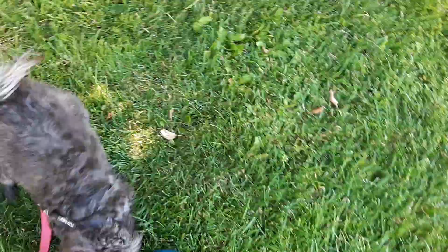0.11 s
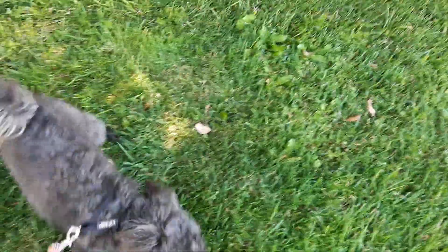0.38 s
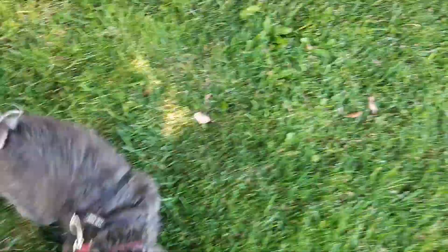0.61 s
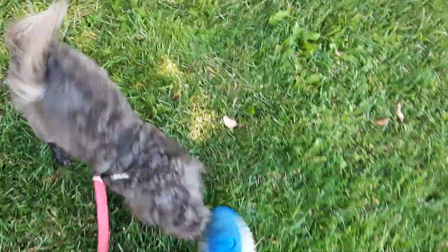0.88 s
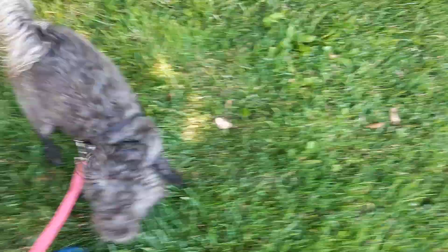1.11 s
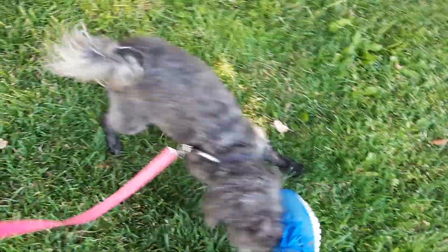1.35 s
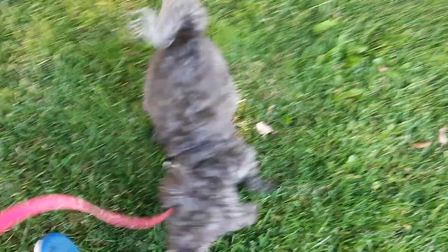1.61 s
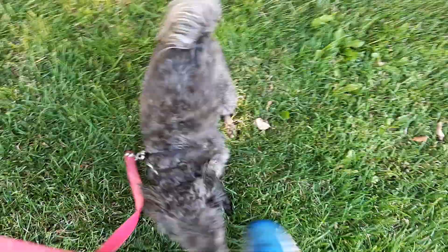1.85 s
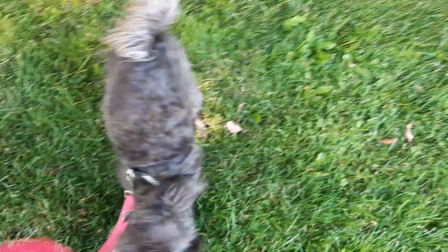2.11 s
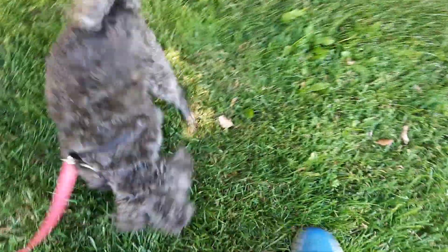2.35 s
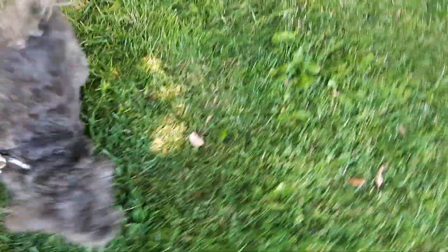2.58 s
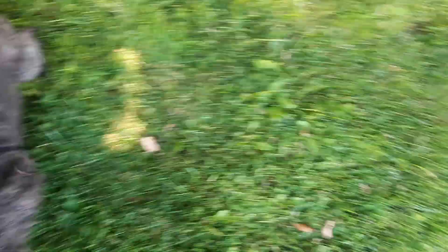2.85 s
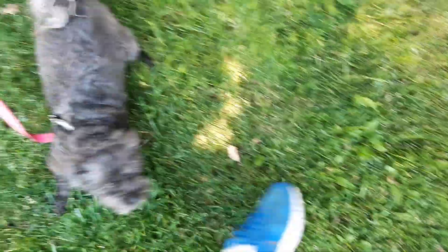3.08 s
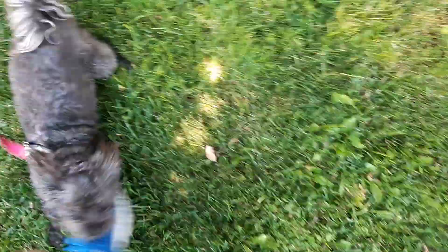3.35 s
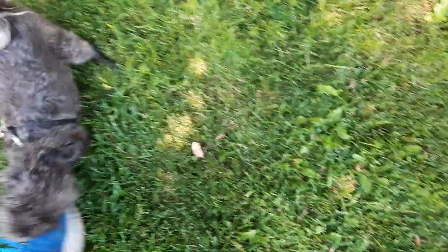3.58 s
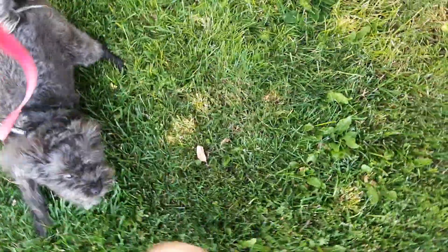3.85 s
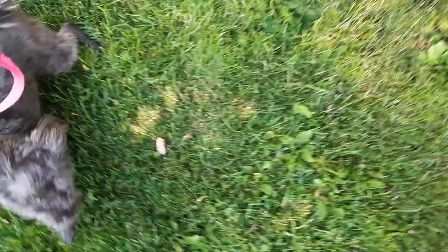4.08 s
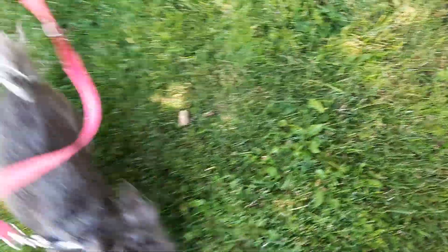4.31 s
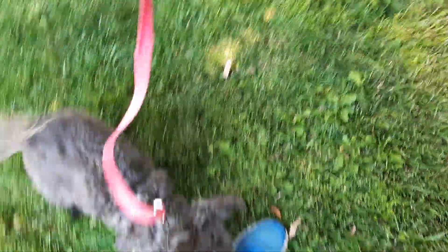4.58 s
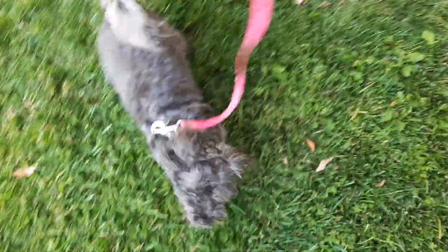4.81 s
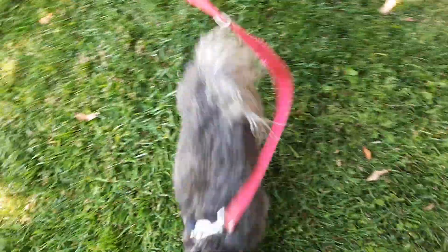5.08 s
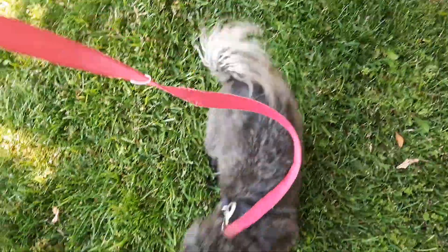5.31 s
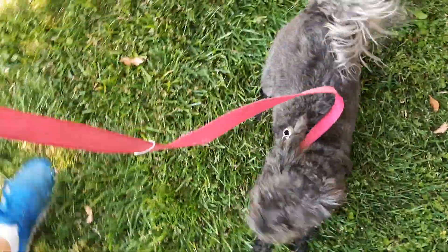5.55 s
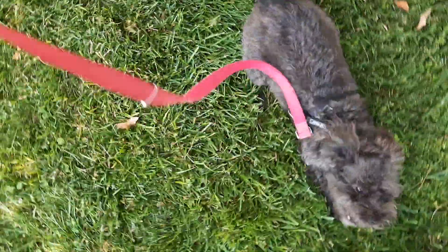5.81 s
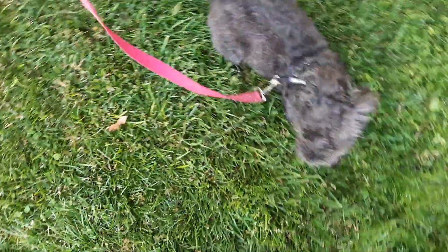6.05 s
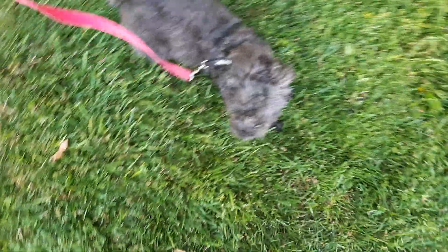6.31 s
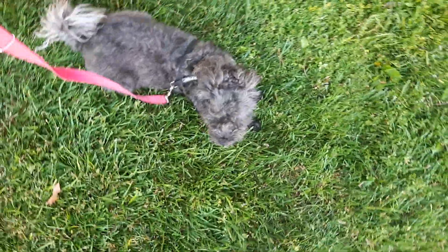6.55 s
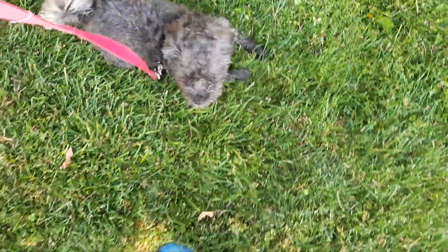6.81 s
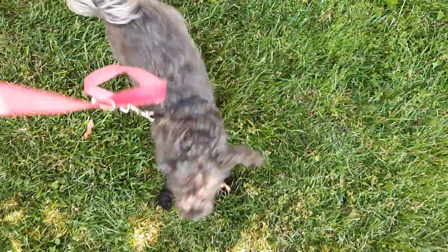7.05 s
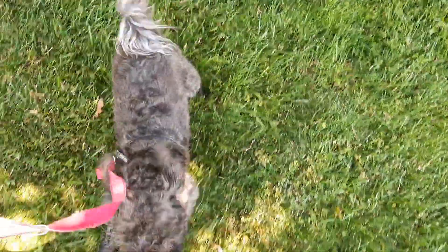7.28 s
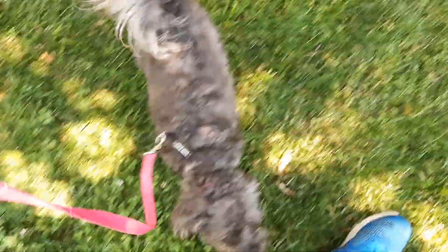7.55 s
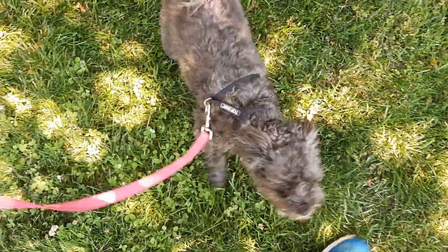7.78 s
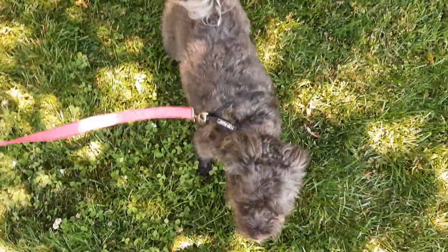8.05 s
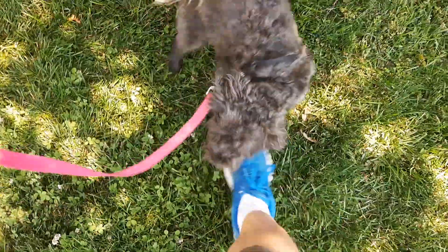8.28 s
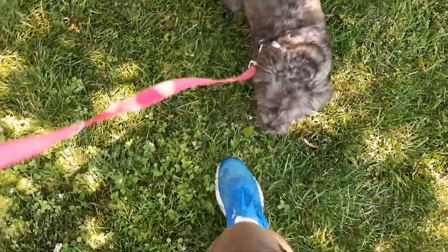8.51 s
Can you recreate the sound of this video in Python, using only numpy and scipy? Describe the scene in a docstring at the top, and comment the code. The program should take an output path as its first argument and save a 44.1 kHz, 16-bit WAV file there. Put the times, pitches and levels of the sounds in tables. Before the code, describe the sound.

Close, dry outdoor sound from a hand-held phone, with faint park hush, rustling grass and uneven low wind. A small dog starts with a soft raspy growl at 0 s; bumps and a clink follow around 0.5 s. Stronger growls come at 0.7 and from 1.1 to 1.9 s, throaty and fluttering, then another at 2.1 s. A brief, higher, sharper snarl jumps out at 2.8 s. Bright collar and leash clinks punctuate this part, notably at 2.1, 3.0 and 3.4 s. Short growls continue at 3.2 and 3.7 s, one swelling at 4.3 to 4.5 s, another at 4.8 s. From 5.2 s they fade to breathy pants; wind swells, with knocks at 5.7 to 6 s. Two loud, abrupt barks strike at 6.85 and 7.2 s, the second pitched a little higher. A faint breath follows at 7.7 s, then a weak dying growl at 8.15 s with a tiny clink.

```python
"""Small dog at play on grass

A small dog on a leash growls, pants and barks twice below a hand-held phone: source-filter synthesis, in
which fold pulses and breath excite resonances of chest, mouth, upper throat and muzzle.
Metal parts of collar and leash clink as sums of decaying modes; buffets and knocks are sinking, dying swings.
Shaped noise gives wind, unrelated at the two microphone ports, and grass rustling under a faint park hush.
"""
import sys
import numpy as np
from scipy import signal
from scipy.io import wavfile
from scipy.ndimage import uniform_filter1d, minimum_filter1d, map_coordinates

SR = 44100
rng = np.random.default_rng(int(sys.argv[2]) if len(sys.argv) > 2 else 0)


def invert_db(level):
    """Linear amplitude ratio for a level in decibels (20 dB per decade), elementwise."""
    return 10 ** (np.asarray(level, dtype=float) / 20)


def unload_wav(signal):
    """Save mono or channel-first audio to the path in sys.argv[1] as 16-bit WAV at rate SR, clipped to [-1, 1]."""
    wavfile.write(
        sys.argv[1],
        SR,
        np.round(np.clip(np.atleast_2d(signal).T, -1, 1) * 32767).astype(np.int16),
    )


N = 381465  # length in samples

# Effort of each call: start_s, rise_s, hold_s, fade_s, first_db, last_db
CALLS = [(0.0, 0.009, 0.35, 0.042, -34, -41.5), (0.67, 0.024, 0.2, 0.054, -27, -27.5),
         (1.11, 0.082, 0.55, .14, -24, -24.5), (2.056, 0.083, 0.26, 0.095, -24.5, -26.5),
         (2.43, 0.026, 0.062, 0.048, -29, -32.5), (2.769, 0.034, 0.085, 0.03, -18.5, -34),
         (3.155, .012, 0.21, 0.061, -29.5, -31.5), (3.402, .012, 0.029, .05, -26.5, -35.5),
         (3.729, 0.051, 0.12, 0.048, -26.5, -42), (4.269, 0.012, 0.24, 0.049, -33.5, -19.5),
         (4.742, 0.027, 0.17, 0.055, -29.5, -24), (5.179, 0.026, 0.18, 0.053, -34.5, -38.5),
         (5.643, .025, 0.12, 0.044, -34, -48), (6.02, 0.023, 0.065, 0.039, -46.5, -49),
         (6.83, 0.047, 0.084, 0.035, -12.5, -15), (7.14, 0.079, 0.071, 0.11, -19.5, -16.5),
         (7.664, 0.019, 0.17, 0.044, -45.5, -51), (8.136, 0.044, 0.25, 0.058, -31.5, -49.5)]
# Voice of each call: central fold rate_hz, roughness (0-1), chest_db, rasp_db,
# brightening by bared teeth_db_per_octave, hiss at the teeth_db
VOICING = [(150.1, .7, -7.5, -18.5, 13, -3.5), (165.8, 1, -7.5, -27.5, 25, -2),
           (205, 0.8, -9.5, -17, 8.5, -5), (177.6, 0.7, -4, -15, 5, -12), (200, 1, -24, -16, 7, 1),
           (334.5, 0.45, -26.5, -11.5, 11, -4.5), (179.7, 0.6, -7, -18.5, 3, -3.5),
           (200, .8, -13, -4.5, 5, -15.5), (203.7, 1, -4, -13.5, -1.5, 0),
           (200, 0.6, -9.5, -23.5, 1, -12.5), (200, 0.6, -10.5, -14.5, -22, 1), (203, 0.97, -6, -11, -7, 4),
           (200, 1, -2, -8.5, -15, 1), (200, 1, 0, -9, 5, 10), (228.2, 0.55, -21.5, -10, 6, -11.5),
           (259, 0.55, -18.5, -9, -9, -14.5), (180.4, 0.5, -7.5, -10.5, -7, 0),
           (191.4, 0.9, -4.5, -18.5, 4, 3.5)]
# Glide of the mouth in each call: mouth first_hz, last_hz, upper resonance first_hz, last_hz,
# upper over mouth first_db, last_db
MOUTH = [(960, 1170, 1900, 1720, -17, 10), (1023, 950, 1600, 1680, -13, 0),
         (970, 1058, 1660, 1670, -19, -16), (1105, 760, 1680, 1670, -13, 4.5),
         (1250, 1260, 1670, 1620, 13, 9), (723, 780, 2070, 2120, 24.5, 8), (1180, 940, 1780, 1780, -10, -8),
         (850, 640, 1900, 1660, -2.5, 7), (1055, 1060, 1560, 1600, -4, -11.5),
         (1050, 910, 2300, 2130, -16, -1), (1130, 710, 1700, 1640, -28.5, 21),
         (777, 720, 1450, 1510, -12, 5), (698, 780, 1540, 1700, 9, 4), (800, 900, 1650, 1820, 10, 4),
         (730, 780, 1640, 1420, 5, 14), (800, 720, 1520, 1100, 8, 6), (690, 670, 1440, 1640, 6.5, 15),
         (1130, 645, 1760, 1830, -37, -1.5)]
# Shares of a call at which the mouth starts and stops moving
GLIDE = (0.19, 0.75)
# Sudden pushes of breath (+) and catches in the throat (-): centre_s, change_db, half_width_s
PUSHES = [(0.21, 12, 0.11), (.695, 8, 0.086), (.903, 9, 0.039), (1.205, -12, 0.014), (1.173, -26, 0.013),
          (1.49, 5, 0.026), (2.35, 3, 0.085), (2.809, 6, 0.045), (2.887, 7.5, 0.018), (3.179, -45, 0.016),
          (4.293, -25.5, 0.018), (4.316, -25, 0.011), (4.35, -36, 0.014), (4.399, 3.5, 0.03),
          (4.46, 10.5, 0.047), (4.785, -28, 0.018), (4.891, -8, 0.078), (5.245, 13, 0.049),
          (6.838, 2.5, 0.0092), (7.315, -11.5, 0.024), (7.737, 11, 0.04), (8.34, 8.5, 0.057)]
HUSH_DB = 28  # how far below its effort a call starts and ends
# Stretches where the folds swing cleanly: start_s, length_s, first_hz, last_hz, level_db, overtones_db
CLEAR_TONES = [(1.349, 0.25, 205, 200, -38, 6.5), (3.32, 0.052, 161, 127, -31.5, -32.5),
               (4.418, 0.03, 264.4, 218, -26, -1), (6.849, 0.11, 240, 301.5, -29.5, 8),
               (6.95, 0.031, 1702, 1276, -10.5, -34.5), (6.951, 0.029, 1199, 624, -14.5, -22),
               (7.206, 0.1, 252.4, 334.7, -36, 15.5), (7.29, 0.034, 548, 495, -29.5, 21.5),
               (7.314, 0.0328, 960, 597, -23.5, -31.5)]
# Chest resonance: centre_hz, width_hz
CHEST = (350, 786)
# Widths of the mouth and upper resonances: mouth_hz, upper_hz
THROAT_WIDTHS = (331, 325)
# High resonances of muzzle and teeth before they shift: centre_hz, level_db,
# swing_db (taken off at a call's start, added at its end, as the lips part)
RASP = [(2286, 4, 4.5), (3198, -2.5, 0), (3970, -4.5, 6.5), (4690, -16, 7), (6950, -8, 2), (13000, -14, 1)]
# Width of each high resonance: width_hz
RASP_WIDTHS = (380, 700, 400, 600, 1600, 12000)
# Slope of the two highest resonances against a call's peak effort: db_per_db
AIR = (-0.4, -0.41)
SHIFTING_DB, WANDER = 3.5, .018  # spread of each high resonance in level (dB) and in pitch (share)
STRAIN = 0.52  # share of effort above a call's median, in dB, that the high resonances do not follow
# Central lead of the left port by where the dog stands: time_s, lead_samples
BEARING = [(0, 11.1), (.8, 15.1), (1.5, 5.4), (2.6, 14.04), (5.3, 7.64), (6.9, 6.2), (7.3, 10.17),
           (7.75, 4.3)]
# Course of the wind before its lumps: time_s, level_db
WIND_LEVEL = [(0.0, -28), (0.45, -37.5), (0.64, -28), (0.77, -43.5), (1.4, -44), (2.26, -36.5), (2.94, -46),
              (4.19, -58), (4.81, -37.5), (5.04, -58.5), (5.36, -35), (5.9, -26.5), (6.63, -65),
              (6.88, -57.5), (7.62, -75.5), (7.74, -47), (7.85, -67.5), (8.22, -40.5), (8.64, -59)]
# Relative spectrum of the wind: frequency_hz, density_db_per_hz
WIND_SPECTRUM = [(20, -29), (60, -2.5), (95, -1.5), (325, -19.5), (700, -46), (1200, -80)]
# Paws and shoes in the grass over the park hush, before the strokes: time_s, level_db
RUSTLE_LEVEL = [(0, -60.5), (.5, -50.5), (3.2, -51), (4.5, -52.5), (6.0, -50.5), (6.3, -64), (7.1, -55),
                (7.9, -64), (8.65, -60)]
# Relative spectrum of rustle and hush: frequency_hz, density_db_per_hz
GRASS_SPECTRUM = [(180, -25.5), (300, -7), (531, -2.5), (1530, -6), (2360, -10.5), (6900, -11.5),
                  (8580, -17.5), (14900, -10.5), (16500, -14)]
# Buffets and knocks on the phone: start_s, initial level_db, initial central pitch_hz
THUMPS = [(0.462, -23, 107), (0.559, -27, 1050), (0.616, -23, 130), (5.714, -18.5, 200),
          (5.826, -10.5, 294), (5.956, -22.5, 135)]
# Clinks of collar and leash: start_s, relative peak level_db
CLINKS = [(0.559, -18.5), (0.728, -30), (0.834, -34), (0.901, -30.5), (1.072, -29), (1.801, -25),
          (2.0847, -33), (2.117, -16.5), (2.4357, -21), (2.8, -28), (2.959, -12.5), (3.1, -33),
          (3.202, -22.5), (3.413, -12), (3.6737, -23.5), (3.721, -28.5), (3.879, -34), (5.096, -27.5),
          (8.3514, -34)]
# Nominal modes of the metal, varied at each clink: pitch_hz, level_db, decay by 60 dB t60_s
METAL_MODES = [(4830, -19, .1), (5450, -22, 0.1), (7920, -18, 0.15), (9900, -26, .1), (11900, -7, 0.08),
               (13160, -7, .13), (14930, -3, .1), (15150, -1, 0.12)]


def evened(x):
    """Normalisation of power: scales to rms 1."""
    return x / np.sqrt(np.mean(x ** 2) + 1e-20)


def read(points, hz):
    """Interpolation of a spectrum on a logarithmic frequency axis."""
    f, value = np.transpose(points)
    return np.interp(np.log(hz + 1), np.log(f + 1), value)


def along(rows):
    """Linear interpolation of a curve at every sample."""
    return np.interp(np.arange(N) / SR, *np.transpose(rows))


def add(mix, s, sound, lead):
    """Superposition with an arrival-time difference: the right port hears it later by lead samples."""
    for port, at in zip(mix, (round(s * SR), round(s * SR + lead))):
        part = port[at:][:len(sound)]
        part += sound[:len(part)]


def averaged_noise(length, size):
    """Low-pass filtering of white noise by a running mean, evened to rms 1."""
    return evened(uniform_filter1d(rng.standard_normal(length), size=size))


def strokes_of_chance(size):
    """Low-pass filtering of white noise by two running means, evened to rms 1."""
    once = uniform_filter1d(rng.standard_normal(N), size=size)
    return evened(uniform_filter1d(once, size=size))


def drift(length, size):
    """Slow random modulation: averaged noise of spread about 1, clipped at 2."""
    noise_in = rng.standard_normal(length)
    return np.clip(np.sqrt(size) * uniform_filter1d(noise_in, size=size), -2, 2)


def resonate(x, hz, width, skirt=1.28):
    """Resonance by heterodyning: shifts hz down to zero, smooths twice, and shifts back."""
    turn = np.exp(2j * np.pi * np.cumsum(hz * np.ones(len(x))) / SR)
    low = x / turn
    for r in np.exp(-np.pi * width * np.array([1, skirt]) / SR):
        low = signal.lfilter([1 - r], [1, -r], low)
    return evened((turn * low).real)


def noise(spectrum, same, patchy_db, size=512):
    """Random short-time spectra with drifting patches; same is the coherence of the ports."""
    a, b, c, d, patches = rng.standard_normal((5, size // 2 + 1, 4 * N // size + 5))
    patches = uniform_filter1d(patches, size=10, axis=0)
    patches = evened(uniform_filter1d(patches, size=12, axis=1))
    left, other = a + 1j * b, c + 1j * d
    z = np.array([left, same * left + np.sqrt(1 - same ** 2) * other])
    density_db = read(spectrum, np.fft.rfftfreq(size, 1 / SR))[:, None]
    z *= invert_db(density_db + patchy_db * patches)
    return evened(signal.istft(z, nperseg=size, noverlap=3 * size // 4)[1][:, :N])


def mouth(t):
    """Articulation: mouth resonance, upper resonance and their balance glide through each call."""
    start, *lengths = np.transpose(CALLS)[:4]
    first_hz, last_hz, first_upper_hz, last_upper_hz, first_db, last_db = np.transpose(MOUTH)
    ends = [[start + share * sum(lengths) for share in GLIDE], (first_hz, last_hz),
            (first_upper_hz, last_upper_hz), (first_db, last_db)]
    s, *columns = [np.transpose(pair).ravel() for pair in ends]
    return [np.interp(t, s, c) for c in columns]


def effort(t, start, rise, hold, fade, first_db, last_db):
    """Breath pressure as an envelope in dB: rise, hold and fade, with pushes and catches."""
    corners_s = start + np.cumsum([0, rise, hold, fade])
    shape_db = np.interp(t, corners_s, [first_db - HUSH_DB, first_db, last_db, last_db - HUSH_DB])
    for s, db, half in PUSHES:
        shape_db = shape_db + db * np.cos(np.pi / 2 * np.clip((t - s) / half, -1, 1)) ** 2
    return shape_db


def excitation(hz, rough, effort_db):
    """Glottal source: uneven fold pulses mixed with breath that puffs in step; returns mix and puffs."""
    length = len(effort_db)
    turns = np.cumsum(hz * np.exp(.7 * rough * averaged_noise(length, 150))) / SR
    sizes, air = rng.standard_normal((2, length))
    pulses = (np.diff(np.floor(turns), prepend=0) > 0) * invert_db(7 * rough * np.clip(sizes, -3, .4))
    puffs = (0.7 + np.exp(-(turns % 1) / 0.4)) * air
    # weak effort: more air than voice
    breath = np.clip(rough * .52 + (effort_db.max() - effort_db) / 40, 0, 1)
    drive = (1 - breath) * evened(pulses) + breath * evened(puffs)
    drive *= invert_db(2.8 * rough * np.clip(averaged_noise(length, 500), -3, 1))  # loose tissue flaps
    drive /= np.sqrt(uniform_filter1d(drive ** 2, size=2500))  # the breath behind it stays even
    return drive, puffs


def muzzle(drive, puffs, effort_db, bright_db, teeth_db):
    """High formants of muzzle and teeth, each wandering at random on its own in level and pitch."""
    progress = np.linspace(-1, 1, len(drive))
    lips = 1 + 0.045 * progress  # drawn back as the call goes on
    shift = [drift(len(drive), size=3000) for _ in RASP]
    strain_db = -STRAIN * np.maximum(effort_db - np.median(effort_db), 0)
    colour_db = [bright_db * np.log2(f / 3000) for f, *_ in RASP[:2]]
    colour_db += [teeth_db] * 2
    colour_db += [slope * (effort_db.max() + 35.5) for slope in AIR]
    rasp = 0
    for k, (f, db, swing_db) in enumerate(RASP):
        level_db = db + strain_db + colour_db[k] + SHIFTING_DB * shift[k] + swing_db * progress
        source = drive if f < 6000 else puffs  # breath alone feeds the highest
        centre_hz = f * lips * np.exp(WANDER * shift[k - 2])
        # signs alternate between neighbours
        rasp = rasp + (-1) ** k * invert_db(level_db) * resonate(source, centre_hz, RASP_WIDTHS[k])
    return rasp


def call(burst, hz, rough, chest_db, rasp_db, bright_db, teeth_db):
    """Source-filter principle: the excitation drives chest, mouth, upper throat and muzzle in parallel."""
    t = np.arange(burst[0], sum(burst[:4]), 1 / SR)
    effort_db = effort(t, *burst)
    mouth_hz, upper_hz, upper_db = mouth(t)
    jaw, tongue = (np.exp(.035 * drift(len(t), size=2000)) for _ in range(2))  # never still
    drive, puffs = excitation(hz, rough, effort_db)
    voice = resonate(drive, mouth_hz * jaw, THROAT_WIDTHS[0])
    voice -= invert_db(upper_db) * resonate(drive, upper_hz * tongue, THROAT_WIDTHS[1])
    voice /= np.sqrt(1 + invert_db(2 * upper_db))
    voice += invert_db(chest_db) * resonate(drive, *CHEST)
    voice += invert_db(rasp_db) * muzzle(drive, puffs, effort_db, bright_db, teeth_db)
    # weaken what lies below the fold rate
    voice = signal.sosfilt(signal.butter(3, hz, "high", fs=SR, output="sos"), voice)
    return invert_db(effort_db) * voice * signal.windows.tukey(len(t), .05)


def clear(s, length, first_hz, last_hz, db, overtones_db):
    """Harmonic series on a gliding tone, its overtones lifted where they cross the resonances."""
    hz = np.linspace(first_hz, last_hz, round(length * SR))
    mouth_hz, upper_hz, upper_db = mouth(s + np.arange(len(hz)) / SR)
    k = np.arange(2, 11)[:, None]  # overtone numbers
    lift = 1 / (1 + (2 * (k * hz - mouth_hz) / THROAT_WIDTHS[0]) ** 2)
    lift += invert_db(upper_db) / (1 + (2 * (k * hz - upper_hz) / THROAT_WIDTHS[1]) ** 2)
    lift += invert_db(-2.5) / (1 + (2 * (k * hz - 2550) / 700) ** 2)
    lift /= 1 + (k * hz / 3000) ** 6
    waver = 1 + .02 * averaged_noise(len(hz), 200)
    angle = 2 * np.pi * np.cumsum(hz * waver) / SR
    overtones = (lift * np.sin(k * angle + k * k)).sum(0)
    tone = np.sin(angle) + invert_db(overtones_db) * overtones
    return invert_db(db) * tone * signal.windows.tukey(len(hz), .6)


def scattered(direct):
    """Scattering as convolution with decaying noise: near from legs and grass, far from the surroundings."""
    t = np.arange(SR // 2) / SR
    near, far = rng.standard_normal((2, 2, len(t)))
    near = signal.lfilter([1, -.8], 1, near) * invert_db(-60 * t / .04)  # treble scatters most
    far *= invert_db(-60 * t / 0.49) * (t > .012)
    scatter = invert_db(-1) * near / np.linalg.norm(near[0])
    scatter += invert_db(-26) * far / np.linalg.norm(far[0])
    return signal.fftconvolve(direct, scatter, axes=1)[:, :N]


def dog():
    """Superposition of calls and clear tones, with a moving time difference between the ports and scatter."""
    out = np.zeros((2, N))
    for burst, voicing in zip(CALLS, VOICING):
        add(out, burst[0], call(burst, *voicing), lead=0)
    for row in CLEAR_TONES:
        add(out, row[0], clear(*row), lead=0)
    lead = along(BEARING) + 2.06 * drift(N, size=2500)  # head and phone keep moving
    out[1] = map_coordinates(out[1], [np.arange(N) - lead])
    return out + scattered(out)


def wind():
    """Turbulent pressure: lumpy low noise, nearly incoherent between the two ports."""
    lumps_db = 4.2 * strokes_of_chance(800)
    port_db = [[-1], [1]]
    turbulence = noise(WIND_SPECTRUM, same=0.05, patchy_db=3, size=2048)
    return invert_db(along(WIND_LEVEL) + lumps_db + port_db) * turbulence


def grass():
    """Friction noise: broadband rustle over the park hush, modulated in uneven strokes."""
    strokes_db = 3.2 * strokes_of_chance(3000)
    return invert_db(along(RUSTLE_LEVEL) + strokes_db) * noise(GRASS_SPECTRUM, same=.15, patchy_db=2.2)


def thumps():
    """Damped oscillation: a few ragged swings of pressure that sink in pitch as they die."""
    out, t = np.zeros((2, N)), np.arange(SR // 10) / SR
    for s, db, hz in THUMPS:
        ragged = 1 + .3 * np.tanh(averaged_noise(len(t), round(SR / hz / 2)))
        angle = 2 * np.pi * np.cumsum(hz * ragged / (1 + t * hz / 8)) / SR
        onset = np.minimum(t * hz * 3, 1)
        add(out, s, invert_db(db - 60 * t * hz / 16) * np.sin(angle) * onset, lead=6.3)
    return out


def clinks():
    """Modal synthesis: a tick, then metal modes in a chance mix; hard knocks crack more and ring shorter."""
    out, t = np.zeros((2, N + SR)), np.arange(SR // 5) / SR
    hz, mode_db, t60 = np.transpose(METAL_MODES)[:, :, None]
    for s, db in CLINKS:
        mix, damping = rng.uniform(-1.98, 1, (2, len(METAL_MODES), 1))
        phase = rng.random((2, len(METAL_MODES), 1))  # separate at each port
        hard = np.clip((db + 32) / 30, 0, 1)
        # the parts swing and touch again
        swing = 1 + .8 * np.cos(2 * np.pi * ((70 + 35 * damping) * t + phase))
        decay_s = t60 * np.exp(.4 * damping - .4 * hard)
        level = swing * invert_db(mode_db + 8 * mix - 60 * t / decay_s)
        modes = level * np.sin(2 * np.pi * (hz * (1 + .004 * damping) * t + phase))
        ring = modes.sum(1) * np.minimum(t / .004, 1)
        crack = np.diff(rng.standard_normal((2, len(t) + 1)))
        tick = invert_db(-15 + 12 * hard - 60 * t / .04) * crack * np.minimum(t / .002, 1)
        clink = (ring + tick) / abs(ring + tick).max()
        out[:, round(s * SR):][:, :len(t)] += invert_db(db + 3) * clink
    return out[:, :N]


def scene():
    """Linear superposition of dog, wind, grass, thumps and clinks at the two ports."""
    return dog() + wind() + grass() + thumps() + clinks()


def roll_off(x):
    """The treble ends steeply here."""
    return signal.sosfilt(signal.butter(12, 16800, fs=SR, output="sos"), x)


def record(dry):
    """Linear filtering by the ports, a treble dip and an upper edge, then peak limiting at full scale."""
    ports = signal.lfilter(*signal.iirnotch(8700, 5.5, SR), dry)
    upper_edge = signal.ellip(10, .2, 45, 15850, fs=SR, output="sos")  # edge in Hz
    ports = signal.sosfilt(upper_edge, ports)
    peak = -minimum_filter1d(-abs(ports).max(0), size=300)
    mix = ports / uniform_filter1d(np.maximum(peak, 1), size=300)
    return roll_off(mix)


dry = scene()
out = record(dry)
unload_wav(out)
```